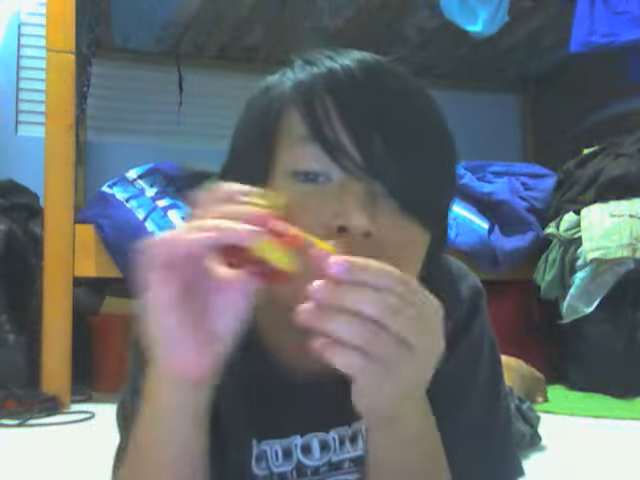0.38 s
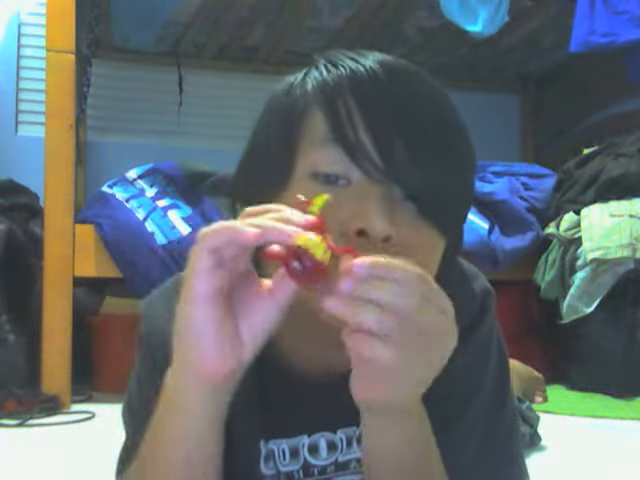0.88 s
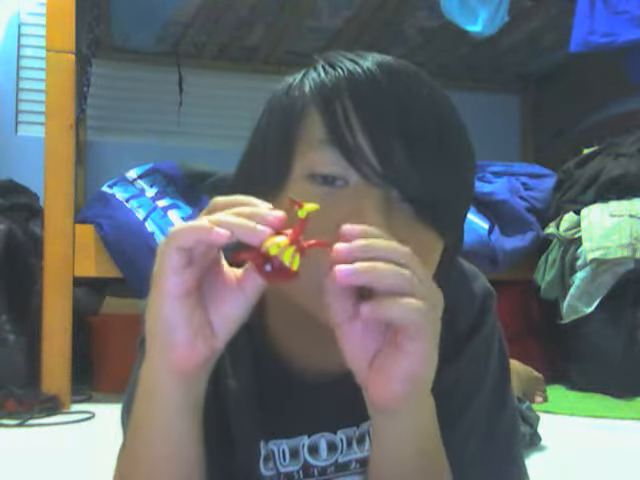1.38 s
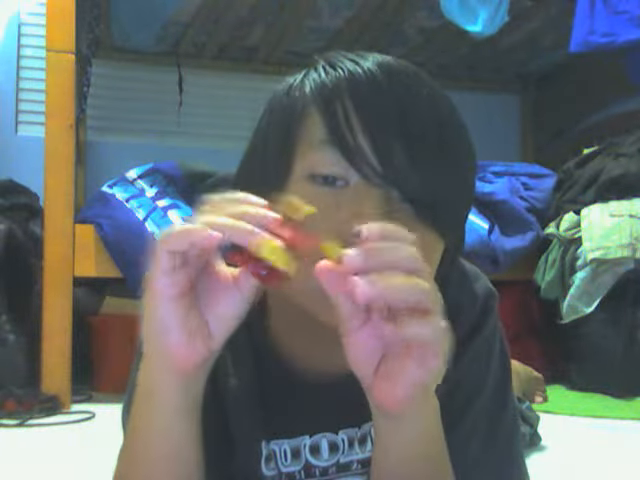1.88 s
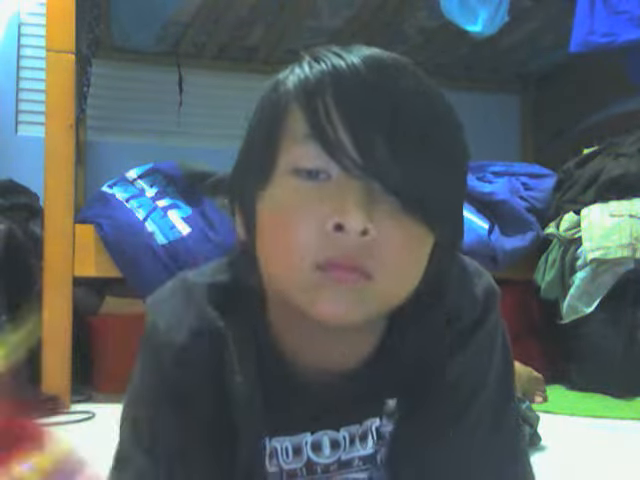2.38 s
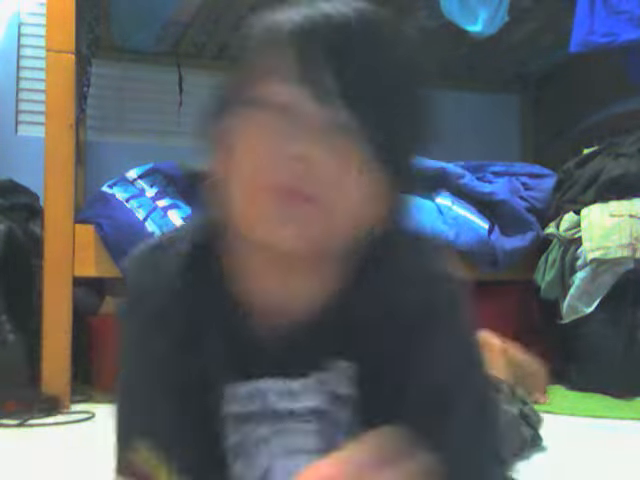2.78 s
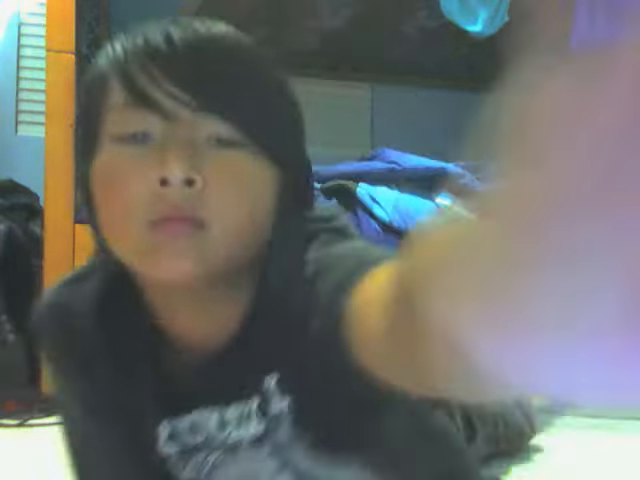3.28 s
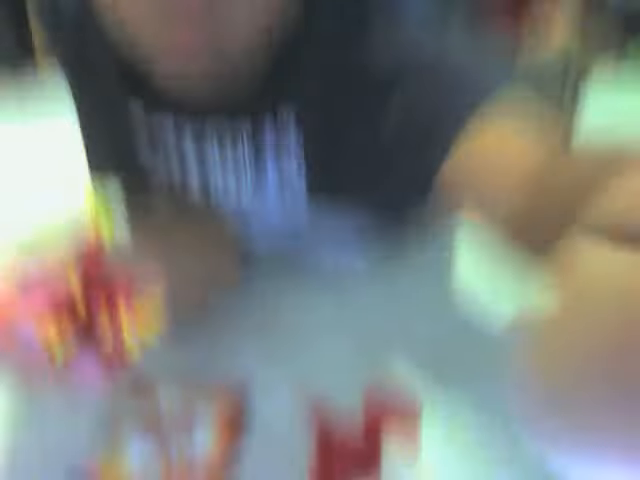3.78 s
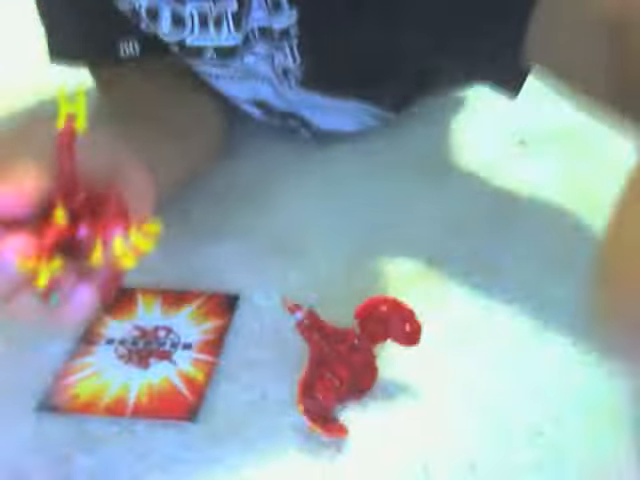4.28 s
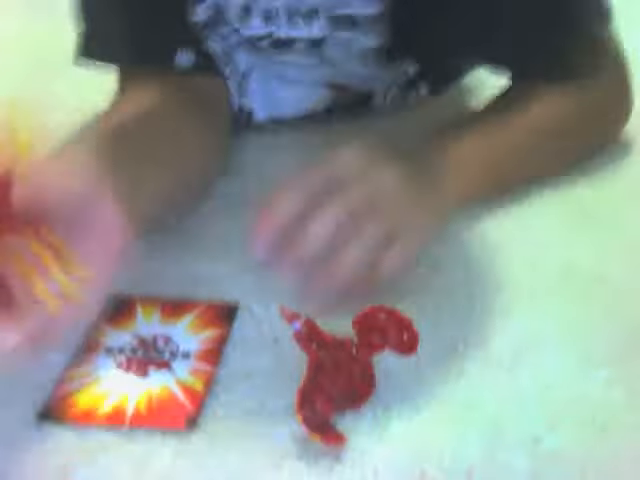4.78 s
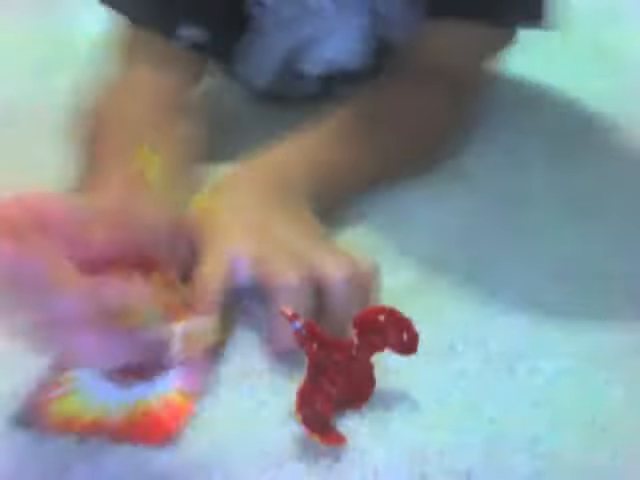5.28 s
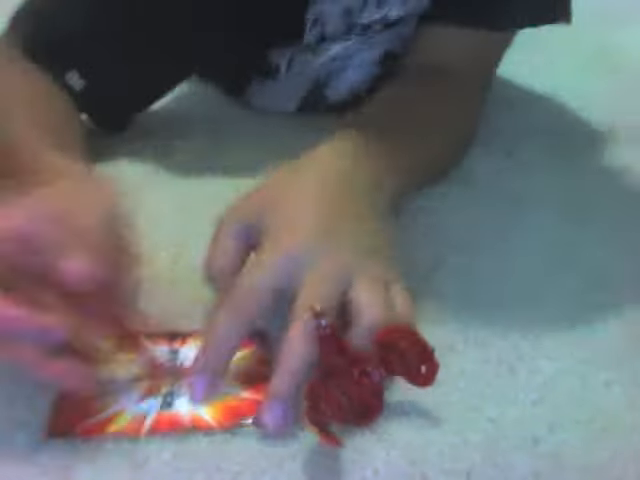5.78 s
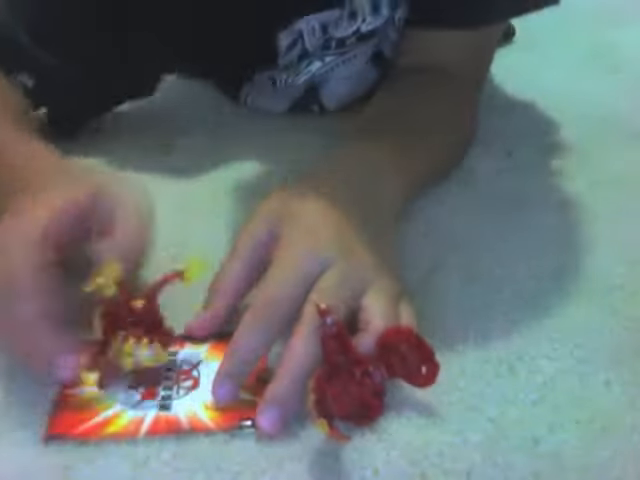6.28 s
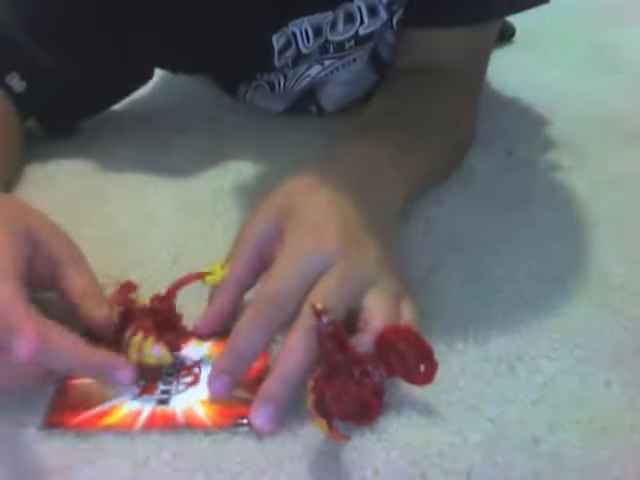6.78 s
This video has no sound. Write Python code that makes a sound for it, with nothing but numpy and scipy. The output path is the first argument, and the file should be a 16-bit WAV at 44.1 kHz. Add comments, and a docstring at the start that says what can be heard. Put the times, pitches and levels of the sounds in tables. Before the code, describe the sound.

Quiet carpeted room with a low, slightly wavering drive hum. A few tiny plastic ticks and soft dull thuds come first. Past the middle of the third second, a laptop lid is tilted: very loud, clipped, hard knocks right at the built-in microphone, then a weaker second cluster. Afterwards sleeves rustle on carpet, the hum throbs, and a small plastic toy clicks and snaps on a card.

```python
"""A laptop lid is tilted close to its microphone: the hinge slips in loud knocks, noise bursts that drive
damped modes of the case, shell and bezel and overload the input. A child handles a small plastic toy in the
quiet carpeted room: its parts tick through high modes, and hands and elbows land in dull single modes.
Rubs and sleeves are coloured noise with moving levels. A drive hums as a wavering sine over the room's air.
Diffuse echoes follow the hits."""
import sys
import numpy as np
from scipy import signal
from scipy.fft import rfft, irfft
from scipy.io import wavfile
from scipy.ndimage import uniform_filter1d

SR = 44100
rng = np.random.default_rng(int(sys.argv[2]) if len(sys.argv) > 2 else 0)


def generate_wav(signal):
    """Clip the signal to [-1, 1] and save it as 16-bit WAV at the path in sys.argv[1]."""
    frames = np.transpose(np.atleast_2d(signal))
    scaled = np.clip(frames, -1, 1) * 32767
    pcm = np.round(scaled).astype(np.int16)
    wavfile.write(sys.argv[1], SR, pcm)


def ratio(d):
    """dB to gain"""
    e = np.asarray(d, float) / 20
    return 10 ** e


N = 314433
T = np.arange(N) / SR  # time in seconds


def lid_knocks():
    """Modal excitation: each slip is a rough impact that rings the shell, the bezel and the hinge."""
    # Hinge slips and taps on the lid. Each row: start in seconds, force on the shell in dB,
    # treble force on bezel and hinge in dB.
    slips = [(3.337, -61.5, -51), (3.558, -16.5, -21), (3.563, -10.5, -13), (3.57, -15, -19),
             (3.579, -15.5, -21), (3.59, -17.5, -23), (3.596, -21.5, -24), (3.605, -6, -19),
             (3.609, -11.5, -28.5), (3.619, -15.5, -31.5), (3.627, -7.5, -14), (3.643, -7, -23),
             (3.658, -12.5, -12.5), (3.686, -20.5, -28), (3.715, -21.5, -41.5), (3.749, -26.5, -37),
             (3.779, -37.5, -47.5), (3.834, -44.5, -55), (3.911, -35.5, -71), (3.922, -15, -16),
             (3.927, -20, -23.5), (4.321, -19, -17), (4.371, -19, -24.5), (4.407, -27.5, -38),
             (4.416, -44, -44), (4.449, -38, -36), (4.488, -43, -51), (4.504, -31.5, -42),
             (4.535, -27.5, -43), (4.54, -17, -26), (4.544, -13.5, -24.5), (4.582, -25, -32),
             (4.589, -26, -40), (4.595, -17, -22), (4.601, -7, -20.5), (4.638, -34, -47.5)]
    # Modes of the shell, the bezel and the hinge. Each row: frequency in Hz, gain in dB, T60 in seconds.
    shell_modes = [(417, -8, .02), (594, -10, 0.034), (762, -5, .05), (892, 0.5, .045), (993.6, 4.5, 0.019),
                   (1245, -1, 0.028), (1500, 0, 0.016), (1700, -10, 0.04), (1970, -21.5, 0.011)]
    bezel_modes = [(2470, -1.7, 0.0011), (3000, -0.37, 0.0033), (3700, -0.19, 0.0046)]
    hinge_modes = [(4520, -0.5, 0.0027), (5350, 3.5, 0.0046), (6030, 1.5, 0.0028), (6800, -4.5, 0.0073)]
    nail_s, nail_db = 3.337, -31.5  # a fingernail touches the bezel
    # faint creaks while the lid settles
    creaks = faint_events(4.02, 4.3, count=6, levels_db=[-57, -63], half_range_db=11)
    s, clack_db, treble_db = np.vstack([slips, creaks]).T

    clack_force = blows(s, clack_db, 0.0011, 1)
    clack = band(ring(clack_force, shell_modes), 250, 2200)

    snap_force = blows([*s, nail_s], [*treble_db, nail_db], 0.0021, 1)
    snap = band(ring(snap_force, bezel_modes), 1700, 3700)

    crack_force = blows(s, treble_db + 2, 0.0012, 0.99)
    crack = band(ring(crack_force, hinge_modes), 4000, 7900)
    return clack + snap + crack


def case_boom():
    """Forced vibration: short jolts and longer shaking drive the low modes of the whole case."""
    # Jolts through the case. Each row: start in seconds, force in dB, contact time constant in seconds.
    jolt_rows = [(3.560, -21.5, .0009), (3.569, -33.5, .00039), (3.575, -29.5, .0009), (3.594, -20, .0026),
                 (4.37, -49, 0.0016), (4.505, -39, .00075), (4.540, -18, .0004), (4.545, -25.5, 0.00036),
                 (4.55, -28.5, 0.0009)]
    # Shudders as the lid moves. Each row: start in seconds, force in dB before the band-pass,
    # time held in seconds, fade in dB per second, centre frequency in Hz.
    shudder_rows = [(3.562, -30.5, 0.026, 250.5, 200), (3.625, -40, .01, 399.5, 300),
                    (3.65, -39, 0.029, 304, 200), (3.693, -42.5, 0.037, 500, 199.5),
                    (3.764, -49.5, 0.0097, 1203, 210), (3.927, -44.5, 0.0074, 894, 280),
                    (4.085, -66.5, 0.0062, 450, 140), (4.19, -71, .005, 379, 111),
                    (4.321, -56, 0.0098, 905, 253), (4.37, -58, 0.012, 239, 139),
                    (4.491, -61.5, .04, 300.5, 150), (4.58, -48, 0.033, 331, 200)]
    # Modes of the case. Each row: frequency in Hz, gain in dB, T60 in seconds.
    case_modes = [(89, -6.5, 0.082), (122.5, -2.5, 0.14), (157, -7, 0.11), (214, 2, 0.043), (270, -5, 0.05),
                  (350, -14, 0.045)]
    rise_db_per_s = 2501
    edge_ratio = 1.745  # from the centre of the shaking to its band edges

    # a longer contact pushes more in all and favours the low modes
    jolts = sum(blows([s], [db], contact_s, 0) for s, db, contact_s in jolt_rows)
    tremor = rng.standard_normal(N)
    shake = 0
    for s, db, held_s, fade_db_per_s, hz in shudder_rows:
        before_s = np.maximum(s - T, 0)
        after_s = np.maximum(T - s - held_s, 0)
        level_db = db - rise_db_per_s * before_s - fade_db_per_s * after_s
        shake = shake + ratio(level_db) * band(tremor, hz / edge_ratio, hz * edge_ratio)
    return band(ring(shake - jolts, case_modes), 66, 580)


def toy():
    """Stiffness sets pitch: tiny parts tick high; the hollow body and the card under it answer lower."""
    # Toy parts snapping. Each row: start in seconds, force of the tick in dB,
    # force of the hollow click in dB.
    snaps = [(0.003, -44, -47), (0.009, -48, -60), (0.025, -51, -48), (0.049, -55, -65), (0.974, -49, -62),
             (1.332, -69, -64), (1.49, -58, -79), (2.303, -57.5, -74), (2.472, -54.5, -76),
             (2.87, -68, -78), (3.131, -47.5, -53.5), (5.317, -50.5, -70), (5.47, -44, -57.5),
             (5.52, -57, -58), (5.629, -47.5, -64), (5.879, -48.5, -50.5), (6.029, -32, -33),
             (6.043, -43, -42.5), (6.197, -48.5, -52), (6.204, -55, -40.5), (6.31, -48, -43),
             (6.323, -42, -35.5), (6.338, -55, -43), (6.347, -59, -38), (6.368, -55.5, -38.5),
             (6.39, -46, -44), (6.421, -49.5, -60.5), (6.838, -55, -50.5), (6.883, -40.5, -42),
             (6.901, -51, -53), (6.965, -56, -56), (6.985, -57, -56), (7.008, -61, -56.5)]
    # The toy set down on the card; a fingertip is duller than plastic. Each row: start in seconds,
    # force in dB before the band-pass, contact time constant in seconds, top frequency in Hz.
    card_knocks = [(5.896, -40.5, 0.0085, 1500), (5.931, -46.5, 0.0058, 1290), (6.029, -44, 0.0014, 3000),
                   (6.038, -43, 0.0056, 2200), (6.204, -39, 0.001, 3000), (6.214, -45.5, 0.012, 1600),
                   (6.365, -53, 0.00098, 3000), (6.888, -61, 0.0022, 3000)]
    # Modes of the parts, the hollow body and the card. Each row: frequency in Hz, gain in dB, T60 in seconds.
    tick_modes = [(7150, 0, 0.027), (7350, 0, 0.015)]
    click_modes = [(3400, -14.5, 0.0057), (4570, 5.5, 0.0038), (5620, 3.5, 0.0023)]
    card_modes = [(462, -1, 0.012), (700, 6.5, 0.014), (1110, 9.5, 0.0092), (1420, -4, 0.0085),
                  (1775, -1, 0.037), (2360, 3, 0.0051)]
    # loose parts rattle faintly while the toy is turned on the card
    rattle = faint_events(6.1, 6.8, count=6, levels_db=[-61, -63], half_range_db=5)
    s, tick_db, click_db = np.vstack([snaps, rattle]).T

    tick = band(ring(blows(s, tick_db, 0.001, 1.0), tick_modes), 6000, 9000)
    click = band(ring(blows(s, click_db, 0.0013, 0.64), click_modes), 1700, 6200)
    card_force = 0
    for at, db, contact_s, top_hz in card_knocks:
        card_force = card_force + band(blows([at], [db], contact_s, 0.99), 227, top_hz)
    return tick + click + ring(card_force, card_modes)


def thuds():
    """Impulse response of a damped resonator: each soft landing rings one dull mode."""
    # Hands and elbows landing on the carpet. Each row: start in seconds, force in dB,
    # frequency in Hz, T60 in seconds.
    landings = [(0.456, -42.5, 214, 0.13), (.47, -43.5, 112, 0.17), (2.111, -64, 270, 0.41),
                (2.898, -61, 403, 0.065), (4.8, -45.5, 224, 0.1), (5.464, -42, 109.7, 0.078)]
    return sum(ring(blows([s], [db], .00003, 0), [(hz, 0, t60)]) for s, db, hz, t60 in landings)


def rubs():
    """Friction noise: each rub is a swell of grainy noise in one band."""
    # Short rubs and scrapes: fingers on card and carpet, the lid's hinge creaking, a scrape after a knock. #
    # Each row: start in seconds, length in seconds, # centre frequency in Hz, bandwidth in Hz, mean level at
    # the peak of the swell in dB.
    strokes = [(2.33, .14, 850, 500, -65), (3.33, .08, 5500, 2500, -67), (5.35, 0.33, 690, 200, -65),
               (6.017, 0.13, 1700, 900, -63.5), (3.327, 0.082, 910, 900, -59), (3.936, 0.35, 920, 398, -53),
               (4.868, 0.092, 3700, 1500, -74.5), (5.219, 0.18, 1700, 1500, -69.5),
               (5.629, 0.059, 3600, 2030, -63), (5.63, 0.071, 6960, 1500, -62),
               (5.922, 0.065, 5740, 1983, -67), (6.11, 0.096, 3780, 600, -79),
               (6.202, 0.35, 3760, 700, -72)]
    out = 0
    for s, length_s, hz, width_hz, db in strokes:
        swell = np.sin(np.pi * np.clip((T - s) / length_s, 0, 1)) ** 1.7
        grain = unit(band(rng.standard_normal(N), hz - width_hz / 2, hz + width_hz / 2))
        out = out + ratio(db + 0.85 * walk(120)) * swell * grain
    return out


def rustle():
    """Friction noise of cloth: two coloured noises flicker in level, the higher one faster."""
    # Sleeves and hands over carpet. Each row: time in seconds, mean level of the low swish in dB,
    # mean level of the high swish in dB.
    swishes = [(0, -69.5, -57), (.16, -71.5, -81.5), (2.28, -69.5, -85), (2.51, -70, -70.5),
               (2.72, -72, -82.5), (2.95, -67.5, -70.5), (3.389, -72.5, -72.5), (3.53, -63, -83),
               (3.8, -48.5, -63.5), (4.31, -60.5, -69.5), (4.7, -69, -86), (4.866, -56, -73.5),
               (5.1, -61, -80.5), (5.449, -57.5, -69), (5.72, -61, -68), (5.87, -74.5, -70.5),
               (5.961, -56.5, -62.5), (6.438, -66, -61), (6.65, -69.5, -76.5), (7.13, -72, -78.5)]
    # Colours of the low and the high swish. Each row: frequency in Hz, relative density in dB per Hz.
    low_colour = [(150, -14), (300, -6.5), (700, -1.5), (1100, -8), (2000, -19), (3000, -43.5)]
    high_colour = [(1500, -24), (2500, -6), (3300, -7), (3800, 0), (4300, -5), (5200, -6), (6000, -0.5),
                   (6600, -4.5), (7200, 3), (7900, -1)]
    s, low_db, high_db = np.transpose(swishes)
    cloth = noise(low_colour)
    # each band of the low swish also wavers on its own
    patchy = 0
    for hz in 250 * 1.6 ** np.arange(6):
        patchy = patchy + band(cloth, hz / 1.3, hz * 1.3) * ratio(1.5 * walk(6))
    low = unit(patchy) * ratio(np.interp(T, s, low_db) + 1.8 * walk(19))
    high = noise(high_colour) * ratio(np.interp(T, s, high_db) + 1.3 * walk(84))
    return low + high


def drive_hum():
    """Periodic rotation gives a near-pure tone; its level throbs, and a faint higher tone flickers."""
    # The hum sinks while the lid is moved. Each row: time in seconds, mean rms level in dB.
    hum_levels = [(0, -52), (3.5, -52.5), (3.85, -65), (4.4, -59.5), (4.749, -53.5), (4.84, -47.5),
                  (4.921, -56.5), (5.2, -50.5), (5.701, -53.5), (7.1, -55)]
    spindle_hz, higher_hz, higher_db = 88.8, 223.5, -77
    # the released lid wobbles and the hum throbs with it
    wobble_hz, wobble_peak_s, wobble_db = 6.35, 5.168, 5.5
    wobble_from_s, wobble_to_s, wobble_fade_s = 4.5, 5.6, .1

    s, db = np.transpose(hum_levels)
    fade_in = np.tanh((T - wobble_from_s) / wobble_fade_s)
    fade_out = np.tanh((T - wobble_to_s) / wobble_fade_s)
    swing = (fade_in - fade_out) / 2
    throb_db = wobble_db * swing * np.cos(2 * np.pi * wobble_hz * (T - wobble_peak_s))
    phase = 2 * np.pi * spindle_hz * T + .1 * walk(3)
    spindle = ratio(np.interp(T, s, db) + throb_db + 1.1 * walk(10)) * np.sin(phase)
    higher_phase = 2 * np.pi * higher_hz * T + 1.8 * walk(5)
    higher = ratio(higher_db + 3 * walk(13)) * np.sin(higher_phase)
    return np.sqrt(2) * (spindle + higher)  # a sine's peak is root 2 times its rms


def room_air():
    """Stationary noise: the quiet room keeps one spectrum and level, strongest in the bass."""
    # Colour of the air. Each row: frequency in Hz, relative density in dB per Hz.
    air_colour = [(20, -37), (35, -19.5), (54, -3), (70, -11), (90, -12), (130, -8.5), (170, -21.5),
                  (250, -18.5), (333, -35), (530, -34), (970, -29), (1300, -35.5), (2200, -46.5),
                  (6200, -49), (8100, -60)]
    return ratio(-59.5) * noise(air_colour)


def echoes(hits):
    """Diffuse reverberation: in each band, noise carries the decaying energy of the hits."""
    # Each row: low edge in Hz, high edge in Hz, T60 in seconds, echo level in dB before the early drop,
    # time of the drop after the hit in seconds.
    decays = [(150, 460, 0.43, -21, 0.26), (600, 1200, 0.44, -11.5, 0.102), (1200, 2000, 0.3, -15, 0.14),
              (2200, 4100, 0.83, -10, .085), (4100, 5200, 0.48, -18, 0.036), (5000, 6200, .35, -9, 0.035),
              (6250, 7700, .3, -9.5, 0.024)]
    late_db = -18  # drop of the tail
    t = T[:SR // 2]
    out = 0
    for low_hz, high_hz, t60, db, heard_s in decays:
        fade = np.exp(-np.log(1000) * t / t60) * (1 - np.exp(-t / .003))
        drop_db = late_db / (1 + np.exp((heard_s - t) / .002))
        fade = fade / np.sqrt(np.sum(fade ** 2)) * ratio(db + drop_db)
        power = signal.fftconvolve(band(hits, low_hz, high_hz) ** 2, fade ** 2)[:N]
        carrier = unit(band(rng.standard_normal(N), low_hz, high_hz))
        out = out + np.sqrt(np.abs(power)) * carrier
    return out


def blows(s, db, contact_s, rough):
    """Contact force: an equal-energy push swells and fades at each time; a rough contact chatters."""
    hits = np.zeros(N)
    np.add.at(hits, (np.asarray(s) * SR).astype(int), ratio(np.asarray(db)))
    u = np.arange(1, int(8 * contact_s * SR) + 3) / (contact_s * SR)
    push = u * np.exp(-u)
    rough = np.clip(rough, 0, 1)
    shape = signal.fftconvolve(hits, push / np.sqrt(np.sum(push ** 2)))[:N]
    return shape * (1 - rough + rough * rng.standard_normal(N))


def ring(force, modes):
    """Modal superposition: a force drives a sum of exponentially damped sines."""
    out = 0
    for hz, db, t60 in modes:
        pole = np.exp((2j * np.pi * hz - np.log(1000) / t60) / SR)
        out = out + ratio(db) * signal.lfilter([1], [1, -pole], force).imag
    return out


def faint_events(from_s, to_s, count, levels_db, half_range_db):
    """Random excitation: small events at uniformly random times, with uniformly scattered levels."""
    chance = rng.random((count, 1 + len(levels_db)))
    s = from_s + (to_s - from_s) * chance[:, 0]
    return np.c_[s, np.add(levels_db, half_range_db * (2 * chance[:, 1:] - 1))]


def noise(spectrum):
    """Spectral shaping: white noise takes the colour of (Hz, dB) points, at rms 1."""
    hz, db = np.transpose(spectrum)
    f = np.arange(N // 2 + 1) * SR / N + 1
    gain = ratio(np.interp(np.log(f), np.log(hz), db))
    return unit(irfft(rfft(rng.standard_normal(N)) * gain, N))


def walk(rate):
    """Slow random modulation: levels held 1 / rate seconds and smoothed twice, at rms 1."""
    k = int(SR / rate)
    held = np.repeat(rng.standard_normal(N // k + 1), k)
    return unit(uniform_filter1d(uniform_filter1d(held, k), k)[:N])


def band(x, low_hz, high_hz):
    """Band limitation: a steep Butterworth band-pass."""
    return signal.sosfilt(signal.butter(3, [low_hz, high_hz], "band", fs=SR, output="sos"), x)


def unit(x):
    """Normalisation to rms 1."""
    return x / np.sqrt(np.mean(x ** 2))


def scene():
    """Linear superposition: the hits and their echoes add to the rubs, cloth, hum and air."""
    hits = lid_knocks() + case_boom() + toy() + thuds()
    return (hits + echoes(hits) + rubs() + rustle() + drive_hum() + room_air())[None]


def roll_off(x):
    """The treble ends steeply here."""
    return signal.sosfilt(signal.butter(12, 8280, fs=SR, output="sos"), x)


def record(dry):
    """Overload: the input cuts deep bass and clips; a steep treble cut makes ripples that clip again."""
    low_hz, top_hz, overload = 42.5, 7520, 1.05  # overload as peak amplitude
    bass_cut = signal.butter(2, low_hz, "high", fs=SR, output="sos")
    treble_cut = signal.ellip(6, .5, 45, top_hz, fs=SR, output="sos")
    clipped = np.clip(signal.sosfilt(bass_cut, dry), -overload, overload)
    rounded = signal.sosfilt(treble_cut, clipped)
    return roll_off(np.clip(rounded, -1, 1))


dry = scene()
out = record(dry)
generate_wav(out)
```